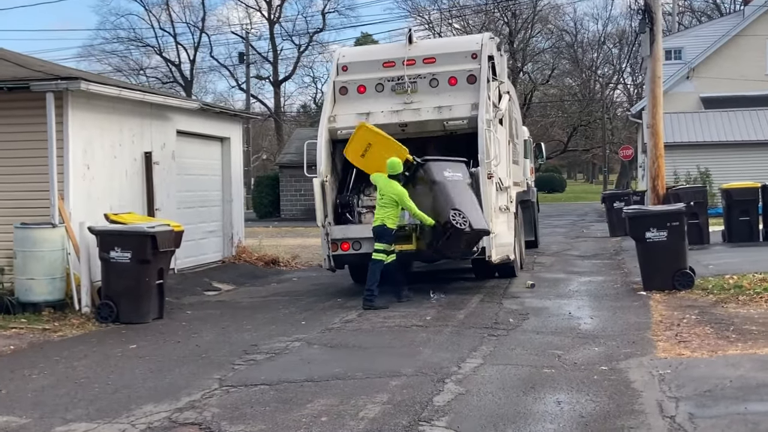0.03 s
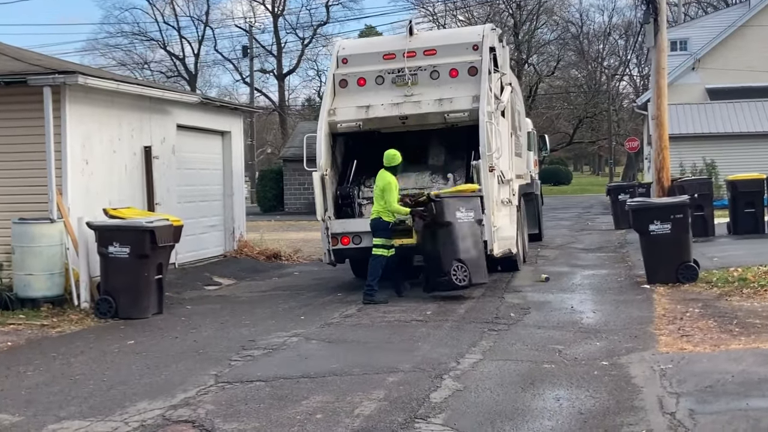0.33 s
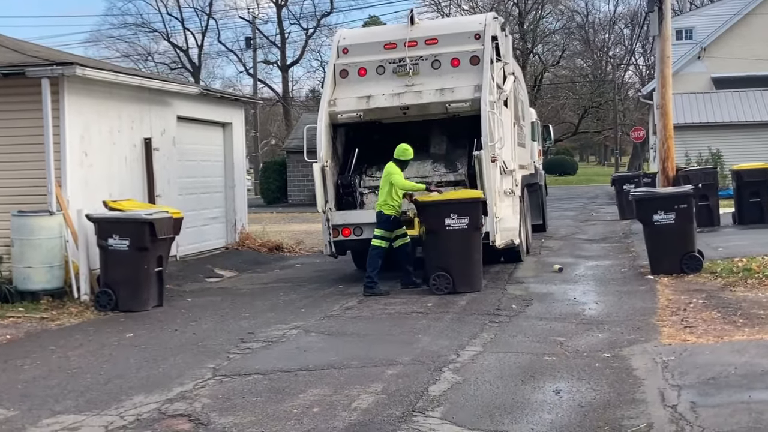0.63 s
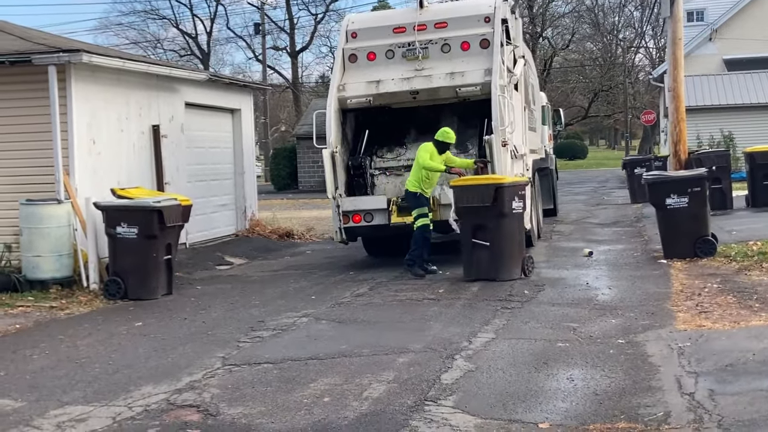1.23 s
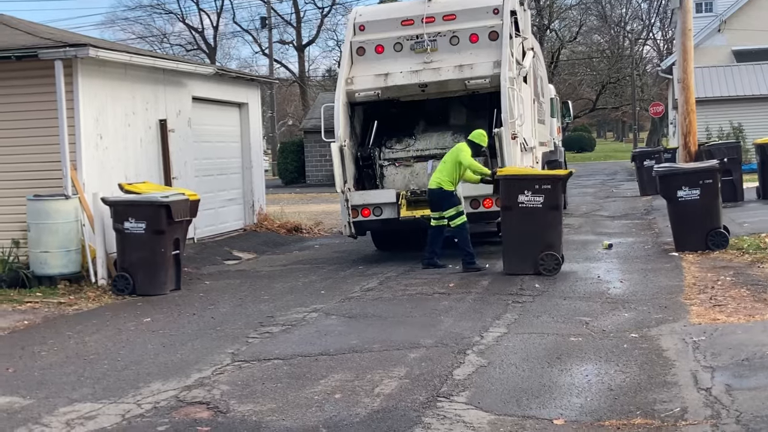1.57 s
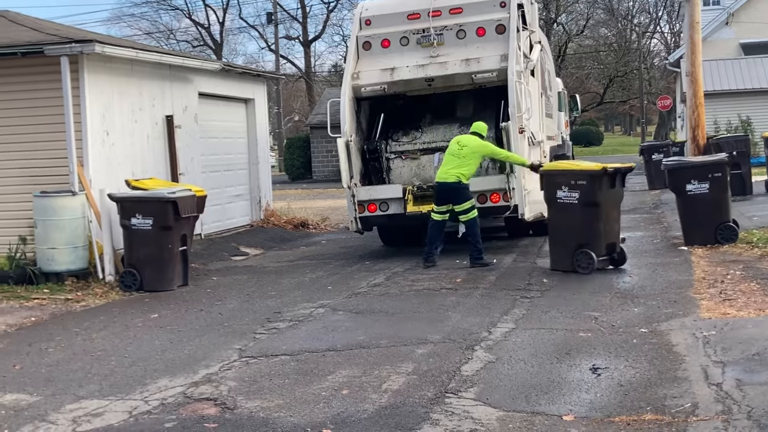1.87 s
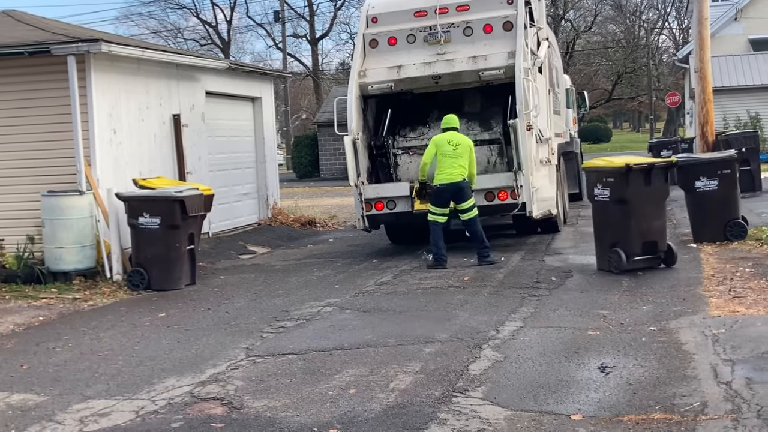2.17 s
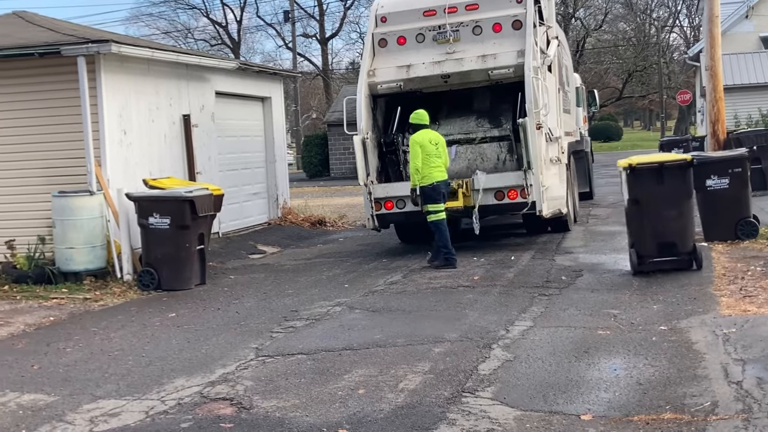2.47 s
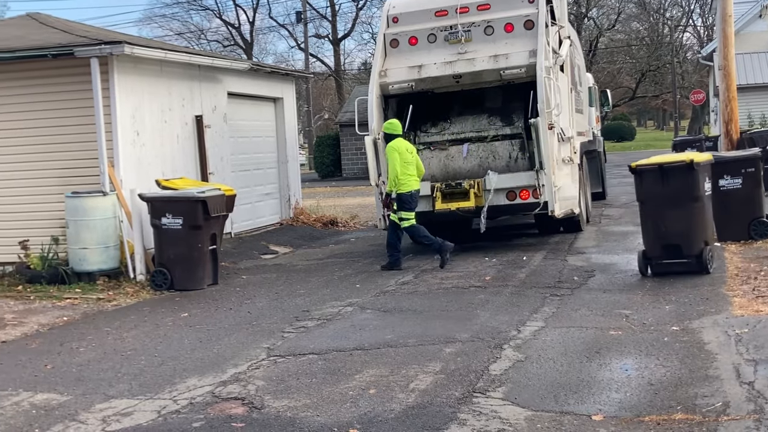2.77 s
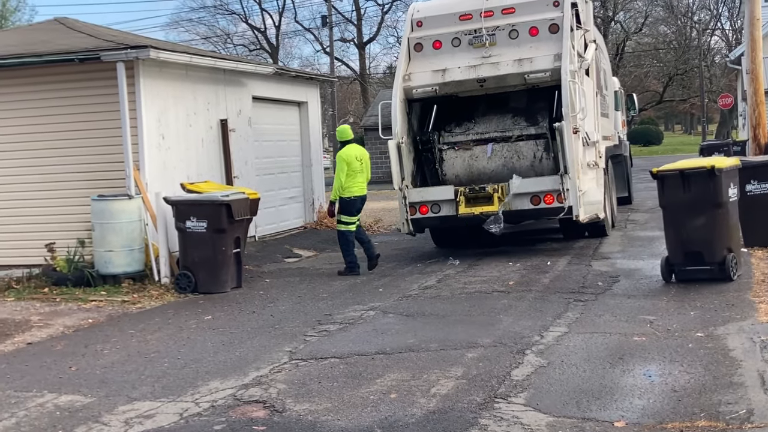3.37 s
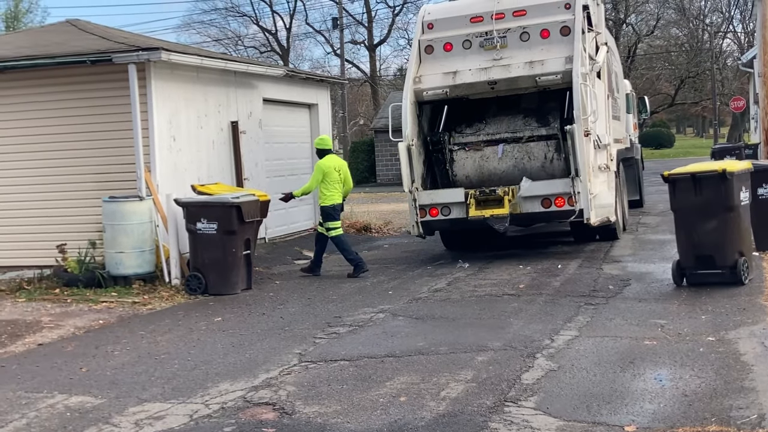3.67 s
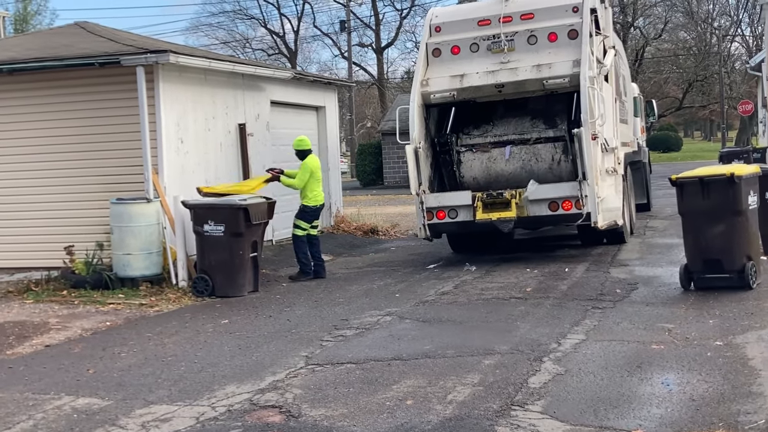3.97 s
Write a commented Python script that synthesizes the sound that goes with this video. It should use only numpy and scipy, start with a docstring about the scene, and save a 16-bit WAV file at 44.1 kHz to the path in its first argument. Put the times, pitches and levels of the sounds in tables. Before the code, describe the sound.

A garbage truck clatters and whines at raised idle in a paved alley. Around 0.3 seconds a plastic bin bangs down hollowly, then rolls and rattles until about 3 seconds, with scattered knocks. Hydraulic hiss builds from about 1 second, with short high squeals and rasps throughout. A few dull thuds follow after 3 seconds, and the engine slows from 3.5 seconds. Nearby walls add short echoes.

```python
"""Refuse truck and wheelie bin.

A truck fires, clatters and whines at raised idle in a paved alley, slowing near the end. Oil hisses,
spurts, squeals and rasps through its compactor valves. A plastic bin is knocked down off the lifter,
cracking and booming, and rolls away rattling. Dull thuds come late; garage walls return short echoes."""
import sys
import numpy as np
from scipy import signal
from scipy.fft import rfft, irfft
from scipy.io import wavfile

SR = 44100
rng = np.random.default_rng(int(sys.argv[2]) if len(sys.argv) > 2 else 0)


def digitize_waveform(pressure):
    """Quantize a signal to 16-bit integers and store it at the path in sys.argv[1].

    Rows of a 2-D input are taken as channels; values are limited to [-1, 1].
    """
    field = np.atleast_2d(pressure).T
    bounded = np.clip(field, -1, 1)
    quanta = np.round(bounded * 32767).astype(np.int16)
    wavfile.write(sys.argv[1], SR, quanta)


N = 176400
T = np.arange(N) / SR
HZ = np.fft.rfftfreq(N, 1 / SR)
BASS_PAN_DB = 2.5


def undb(db):
    """Decibels to gain."""
    return 10 ** (np.asarray(db) / 20)


def unit(x):
    """Scale to rms 1."""
    return x / np.sqrt(np.mean(x ** 2) + 1e-18)


def curve(rows, column=1):
    """One table column, interpolated over time."""
    rows = np.array(rows)
    return np.interp(T, rows[:, 0], rows[:, column])


def colour(x, points):
    """Filter by (freq_hz, gain_db) points; rms 1."""
    hz, db = np.array(points).T
    gain = undb(np.interp(np.log(HZ + 1), np.log(hz), db))
    return unit(irfft(rfft(x) * gain, N))


def band(x, hz, width_hz):
    """A resonance applied twice; rms 1."""
    return unit(irfft(rfft(x) / (1 + ((HZ ** 2 - hz ** 2) / ((HZ + 1) * width_hz)) ** 2), N))


def drift(rate_hz):
    """Smooth random wander; rms 1."""
    return unit(irfft(rfft(rng.standard_normal(N)) / (1 + (HZ / rate_hz) ** 4), N))


def pan(db):
    """Stereo gains, left over right by db."""
    return undb(np.array([[db], [-db]]) / 2)


def noise(side):
    """Stereo noise; side 0 is mono, 1 uncorrelated."""
    mid, spread = rng.standard_normal((2, N))
    return unit(mid + side * spread * np.array([[1], [-1]]))


def fade(start, attack_s, decay_s):
    """Linear attack, exponential decay."""
    age = T - start
    return np.clip(age / attack_s, 0, 1) * np.exp(-np.clip((age - attack_s) / decay_s, 0, 50))


def narrowband(phase, width_hz, side):
    """Stereo noise band round a moving pitch."""
    lowpass = 1 / (1 + (2 * HZ / width_hz) ** 2)
    a, b = (unit(irfft(rfft(noise(side)) * lowpass, N)) for _ in range(2))
    return a * np.cos(phase) + b * np.sin(phase)


# Speed and load: time_s, firing_hz, level_db
ENGINE_RUN = [(0, 79.43, -21), (.6, 78.17, -24.5), (1.2, 78.23, -23), (2.6, 77.3, -22.5), (3.1, 77.26, -24),
              (3.45, 78.35, -23), (3.6, 67.93, -27), (3.8, 58.76, -30.5), (4, 50.15, -29.5)]
# Engine and pump whines: firing_multiple, level_db
WHINES = [(1, -11.5), (2.985, 0), (3.93, -15.5), (4.58, -5)]
# Engine body: freq_hz, gain_db
ENGINE_COLOUR = [(20, -33), (35, -33), (55, -0.5), (85, -2.5), (170, 3.5), (290, 4.5), (400, -7),
                 (550, -14.5), (740, -23.5), (950, -10.5), (1250, -23), (1700, -17), (2050, -28.5),
                 (2600, -23.5), (5000, -59), (15000, -90.5)]

def engine():
    """Uneven firings and clatter in one body, with wavering whines locked to the shaft."""
    cycles = np.cumsum(curve(ENGINE_RUN) * (1 + .003 * drift(4))) / SR
    firings = np.diff(np.floor(cycles), prepend=0) * undb(12 * rng.standard_normal(N))
    clatter = unit(noise(side=.21) * (1 + .21 * np.exp(-(cycles % 1) / .9)))
    body = colour(clatter + .14 * unit(firings), ENGINE_COLOUR)
    whine = 0
    for multiple, db in WHINES:
        amplitude = np.sqrt(2) * undb(db + 2 * drift(3.7))
        whine += amplitude * np.sin(2 * np.pi * multiple * cycles + .31 * drift(10.6))
    return (undb(.5) * body + undb(-3.5) * whine) * undb(curve(ENGINE_RUN, column=2)) * pan(BASS_PAN_DB)


# Oil flow envelopes: time_s, hiss_db, top_octave_db
OIL_FLOW = [(0, -43.5, -47.5), (.5, -45, -62), (.85, -37.5, -46.5), (1.2, -34.5, -39.5), (1.45, -32, -36.5),
            (1.8, -28.5, -36), (1.95, -33, -43), (2.15, -29.5, -36), (2.3, -26.5, -33.5), (2.7, -25.5, -32),
            (2.91, -25, -31), (2.94, -31, -34), (3.0, -25, -30.5), (3.3, -25.5, -31), (3.55, -23.5, -33),
            (4, -26.5, -36)]
# Hiss spectrum: freq_hz, gain_db
HISS_COLOUR = [(1500, -6.5), (2100, -11.5), (2600, -3), (3200, -4.5), (4100, 1.5), (4900, 2), (5500, -6),
               (6100, -3), (7000, -11.5), (11000, -59)]
# Top octave spectrum: freq_hz, gain_db
TOP_COLOUR = [(5900, -29), (6900, 6), (8000, 6), (9300, -0.5), (10500, 9), (12000, 3), (13500, -1),
              (16000, -8.5)]

def oil_hiss():
    """Turbulent oil in the lines; hiss and valve spurts flutter together."""
    flutter = undb(.8 * drift(25))
    hiss = colour(noise(side=.65), HISS_COLOUR) * undb(curve(OIL_FLOW) - 3) * pan(2.7)
    top = colour(noise(side=.05), TOP_COLOUR) * undb(curve(OIL_FLOW, column=2) + 2)
    return (hiss + top + valve_spurts()) * flutter


# Rolling on asphalt: time_s, level_db
ROLL = [(0, -25.5), (.5, -23.5), (.75, -32), (1, -24), (1.4, -24), (1.6, -29.5), (1.9, -22), (2.15, -20),
        (2.4, -27), (2.55, -27.5), (3.1, -30.5), (4, -53)]
# Rumble spectrum: freq_hz, gain_db
ROLL_COLOUR = [(25, -33), (60, 4), (120, 8), (300, -2.5), (450, -3), (750, -15.5), (1000, -21),
               (1600, -22.5), (2200, -58), (14000, -81)]

def wheels(jolts_per_s=160):
    """Hard wheels jolt over grit and drum the empty bin."""
    jolts = (rng.random(N) < jolts_per_s / SR) * rng.standard_normal(N)
    return colour(unit(jolts) + noise(side=.24), ROLL_COLOUR) * undb(curve(ROLL)) * pan(BASS_PAN_DB)


# Plastic wall, rattled or knocked: freq_hz, gain_db
WALL_COLOUR = [(150, -4.5), (350, 2.5), (480, 5.5), (680, -11.5), (950, 3), (1250, -3), (1600, 0),
               (2000, -15.5), (2400, -6), (3200, -23), (8000, -31)]

def lid_rattle(taps_per_s=60, decay_s=.0094):
    """Loose lid and axle chatter against the wall as the bin rolls."""
    taps = (rng.random(N) < taps_per_s / SR) * rng.random(N)
    shake = unit(signal.lfilter([1], [1, -np.exp(-1 / (decay_s * SR))], taps))
    return colour(noise(side=1), WALL_COLOUR) * shake * undb(curve(ROLL) - 14) * pan(BASS_PAN_DB)


# Valve tones: start_s, end_s, first_hz, last_hz, level_db, roughness (0-1), pan_db
SQUEALS = [(.08, .11, 5450, 5430, -41, .3, 0), (.545, .7, 10300, 10380, -35, .2, -1),
           (.73, .78, 10550, 10850, -41, .5, 0), (.78, .89, 11430, 11420, -37.5, .2, 0),
           (.918, 1.0, 5020, 4985, -29.5, .1, 0), (1.02, 1.07, 4985, 4940, -24, .25, -3),
           (1.11, 1.245, 4925, 4880, -27, .25, -3), (1.06, 1.42, 8300, 7900, -37, .7, 0),
           (1.48, 1.76, 4260, 4205, -34.5, .45, 4), (1.555, 1.63, 4245, 4222, -25.5, .1, 10),
           (1.55, 1.67, 8490, 8440, -37, .25, 0), (1.75, 2.22, 4770, 4715, -37, .6, 1),
           (1.835, 1.95, 10580, 10380, -29.5, .25, 0), (2.0, 2.19, 10200, 9600, -31.5, .8, 0),
           (2.67, 2.96, 10770, 10830, -32.5, .3, 0), (3.07, 3.15, 10960, 10920, -37, .4, 0),
           (3.072, 3.32, 5160, 5190, -24, .05, 5), (3.15, 3.3, 6205, 6180, -37, .2, 1),
           (3.388, 3.56, 2518, 2542, -23, .1, 6), (3.615, 3.73, 5005, 4980, -27.5, .06, 1),
           (3.66, 3.88, 2325, 2285, -32.5, .4, 4)]

def valve_squeals(attack_s=.0017, release_s=.0035, swell_s=.04, trail_s=.13, skirt_db=-8):
    """Valves sing short wavering tones that grow out of a noise skirt and sink back into it."""
    out = np.zeros((2, N))
    for start, end, first_hz, last_hz, db, rough, pan_db in SQUEALS:
        progress = np.clip((T - start) / (end - start), 0, 1)
        glide_hz = first_hz + (last_hz - first_hz) * progress ** .709  # quick, then settling
        waver = 1 + .00716 * rough * (drift(59) + drift(13.5))
        phase = 2 * np.pi * np.cumsum(glide_hz * waver) / SR
        blur_s = .11 * rough  # rough squeals start and stop slowly
        gate = np.clip((T - start + blur_s / 2) / (attack_s + blur_s), 0, 1)
        gate *= np.exp(-np.clip((T - end) / (release_s + blur_s), 0, 50))
        skirt = np.exp(np.minimum((T - start) / swell_s, 0) - np.maximum((T - end) / trail_s, 0))
        dip_db = -1.5 * (np.sin(np.pi * progress) - .5)
        flutter_db = 4 * rough * drift(25)
        tone = np.sqrt(2 * (1 - rough)) * np.sin(phase) * gate * undb(dip_db + flutter_db)
        grit = 1.09 * narrowband(phase, width_hz=.0062 * first_hz, side=.2)
        grit *= np.sqrt(rough) * gate + undb(skirt_db) * skirt
        out += (tone + grit) * undb(db) * pan(pan_db)
    return out


def ring(modes, age, rise_s):
    """Decaying modes, detuned at random for each blow."""
    out = 0
    for (hz, db, t60_s), (detune, offset) in zip(modes, rng.random((len(modes), 2))):
        cycles = hz * (1 + .046 * (detune - .5)) * age + offset
        out += undb(db - 60 * age / t60_s) * np.sin(2 * np.pi * cycles)
    return out * (1 - np.exp(-age / rise_s))


# Blows on the bin: start_s, wall_db, boom_db, crack_db
KNOCKS = [(0.286, -9.5, -19, -11.5), (.309, -43, -12, -48), (0.328, -56, -25, -49), (0.381, -19, -48, -16),
          (0.458, -13, -16.5, -26.5), (0.488, -28.5, -23.5, -62), (1.007, -23, -25.5, -50),
          (1.250, -34, -19.5, -55), (1.349, -25, -43, -55), (1.388, -22.5, -25, -50),
          (1.657, -20, -27, -48), (1.914, -20, -23.5, -46), (1.973, -24.5, -30, -52),
          (2.018, -19.5, -44, -46), (2.514, -16, -25.5, -40)]
# Hollow body: pitch_hz, level_db, t60_s
BODY_MODES = [(72, -10, .5), (102, -2.5, .28), (137.5, 3, 0.2), (185.7, 3.5, 0.23), (262, 0.5, .15),
              (310.5, 2.5, 0.18), (374, 7.5, 0.045)]
# Plastic wall: pitch_hz, level_db, t60_s
WALL_MODES = [(387, -3, 0.041), (659.6, -3, 0.19), (862, -0.5, 0.12), (1081, 3, 0.029), (1290, -7, 0.07),
              (1505, 2, 0.06), (2210, -30, 0.043)]

def bin_knocks():
    """Each blow cracks, rattles and rings the plastic wall, and booms in the hollow body."""
    wall_noise = colour(noise(side=.32), WALL_COLOUR)
    crack = band(noise(side=.49), hz=2100, width_hz=5100)
    out, age = np.zeros((2, N)), T[:SR // 2]
    for start, wall_db, boom_db, crack_db in KNOCKS:
        out += undb(wall_db) * wall_noise * (fade(start, .0005, .0097) + .17 * fade(start, .0053, .064))
        out += undb(crack_db) * crack * fade(start, .00018, .0029)
        boom = undb(boom_db) * ring(BODY_MODES, age, rise_s=.0027)
        wall_ring = undb(wall_db - 6) * ring(WALL_MODES, age, rise_s=.001)
        i = int(start * SR)
        out[:, i:i + len(age)] += (boom + wall_ring)[:N - i]
    return out * pan(2.5)


# Valve openings: start_s, attack_s, decay_s, level_db, centre_hz, width_hz
SPURTS = [(0.573, 0.024, 0.092, -23.5, 7100, 10000), (0.949, 0.089, 0.046, -28.5, 3370, 4500)]

def valve_spurts():
    """Oil bursts through an opening valve as broad noise."""
    return sum(band(noise(side=.28), hz, width_hz) * fade(start, attack_s, decay_s) * undb(db)
               for start, attack_s, decay_s, db, hz, width_hz in SPURTS)


# Jet noise bands: start_s, end_s, first_hz, last_hz, width_hz, level_db, pan_db
RASPS = [(1.2, 1.6, 5550, 5100, 200, -36, -1), (1.25, 1.8, 4850, 4350, 450, -31, 3),
         (2.15, 2.7, 6950, 6850, 300, -36, -3), (2.42, 2.65, 4920, 4880, 160, -36, 0),
         (2.4, 3.0, 4150, 3850, 380, -33, 1), (2.98, 3.6, 3650, 2700, 700, -31, 8.5),
         (3.25, 4.2, 2460, 2290, 220, -30, 5), (3.15, 4.0, 5200, 4900, 170, -32.5, 0),
         (3.35, 4.2, 4550, 4450, 200, -35, 0), (2.95, 3.6, 6350, 5950, 320, -35, -1)]

def valve_rasps():
    """Whistles that fail to lock: gliding bands of jet noise that swell and die away."""
    out = np.zeros((2, N))
    for start, end, first_hz, last_hz, width_hz, db, pan_db in RASPS:
        progress = np.clip((T - start) / (end - start), 0, 1)
        phase = 2 * np.pi * np.cumsum(first_hz + (last_hz - first_hz) * progress) / SR
        out += narrowband(phase, width_hz, side=.11) * np.sin(np.pi * progress) * undb(db) * pan(pan_db)
    return out


# Dull thuds: start_s, level_db
THUDS = [(3.179, -19.5), (3.309, -26), (3.459, -19.5), (3.58, -29), (3.789, -24.5)]

def thuds(final_hz=62.4, sag_s=.033):
    """Soft thumps like heavy steps: a few sinking cycles plus low noise."""
    out = np.zeros((2, N))
    for start, db in THUDS:
        age = np.maximum(T - start, 0)
        cycles = np.cumsum(final_hz * (1 + np.exp(-age / sag_s)) * (age > 0)) / SR
        rumble = 1.1 * band(noise(side=.24), hz=75, width_hz=70)
        out += undb(db) * fade(start, .019, .034) * (np.sin(2 * np.pi * cycles) + rumble)
    return out * pan(BASS_PAN_DB)


def wall_echoes(x, t60_s=.2, gap_s=.008, bounces_per_s=1200, split_hz=650):
    """Garage walls scatter echoes, shared in the bass and separate in each ear above it."""
    bounces = rng.standard_normal((2, N)) * (rng.random((2, N)) < bounces_per_s / SR)
    bounces *= undb(-60 * T / t60_s) * (T > gap_s)
    spectrum = rfft(bounces / np.sqrt(np.sum(bounces ** 2, axis=1, keepdims=True)))
    apart = HZ ** 2 / (HZ ** 2 + split_hz ** 2)
    shared = np.sqrt((1 - apart) / 2) * (1 - apart) * spectrum.sum(0)
    response = irfft(np.sqrt(apart) * spectrum + shared, N)
    return signal.fftconvolve(x, response[:, :SR], axes=1)[:, :N]


# Left channel phase: freq_hz, lead_rad
LEFT_LEAD = [(2100, -0.089), (2600, 1), (4200, -1.44), (4900, -0.36), (5200, -1.84), (6200, -0.23)]

def microphone_skew(x, lag_from_hz=7000, lag_s=.000227):
    """Two microphones hear the treble out of step; the left lags at the very top."""
    lead_rad = np.interp(HZ, *np.array(LEFT_LEAD).T)
    lead_rad -= 2 * np.pi * lag_s * np.maximum(HZ - lag_from_hz, 0)
    left = irfft(rfft(x[0]) * np.exp(1j * lead_rad), N)
    return np.array([left, x[1]])


def scene():
    """Truck and bin between the garages; engine, wheels and thuds stay dry."""
    noises = oil_hiss() + valve_rasps() + bin_knocks() + lid_rattle()
    squeals = valve_squeals()
    bass = engine() + wheels() + thuds()
    echoes = wall_echoes(undb(-6) * noises + undb(-11) * squeals)
    return microphone_skew(bass + noises + squeals + echoes)


def record(dry):
    """Soft peak limit, then a steep low-pass."""
    ceiling, cutoff_hz = .88, 15900
    rounded = dry / (1 + (dry / ceiling) ** 6) ** (1 / 6)
    return signal.sosfilt(signal.ellip(8, .2, 70, cutoff_hz, fs=SR, output="sos"), rounded)


dry = scene()
out = record(dry)
digitize_waveform(out)
```